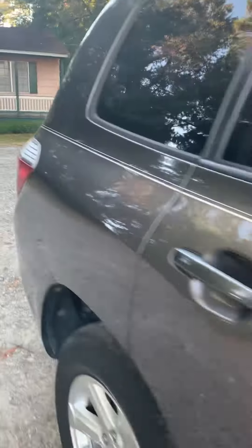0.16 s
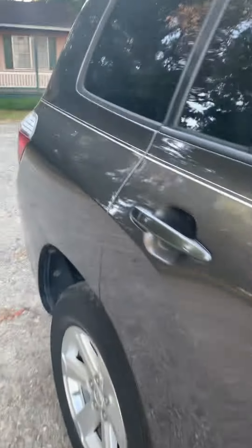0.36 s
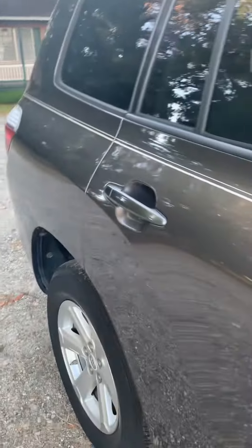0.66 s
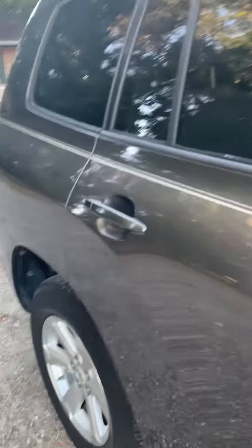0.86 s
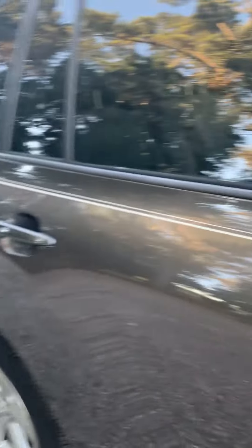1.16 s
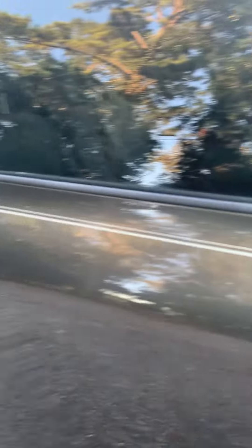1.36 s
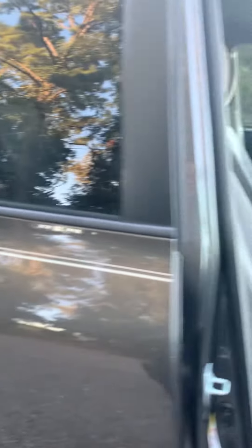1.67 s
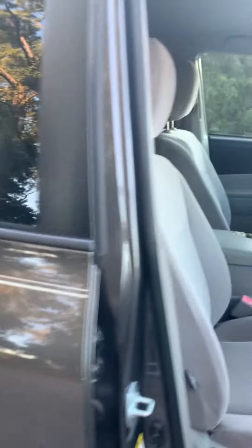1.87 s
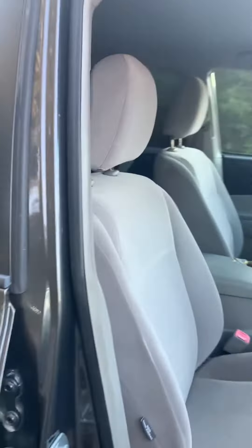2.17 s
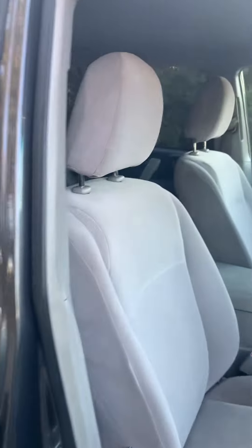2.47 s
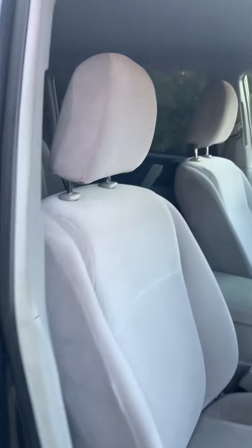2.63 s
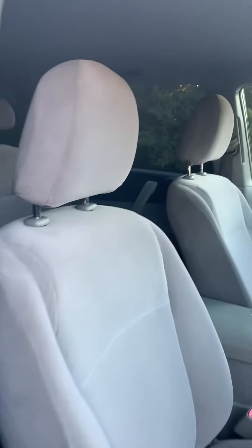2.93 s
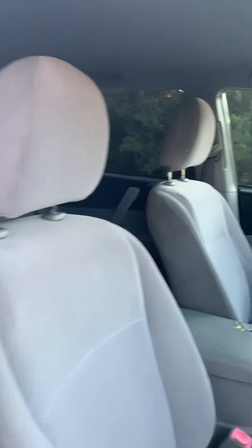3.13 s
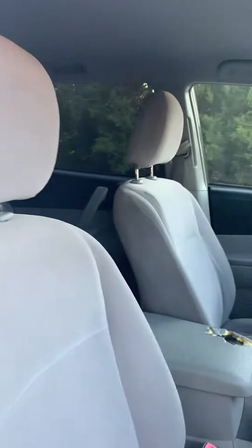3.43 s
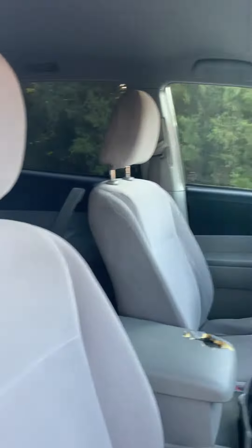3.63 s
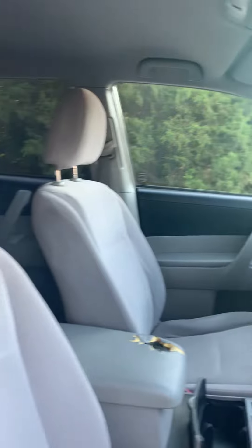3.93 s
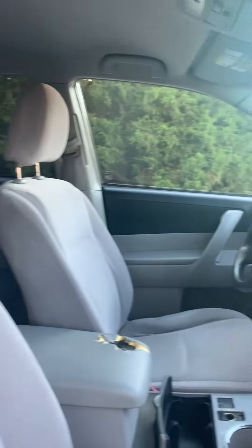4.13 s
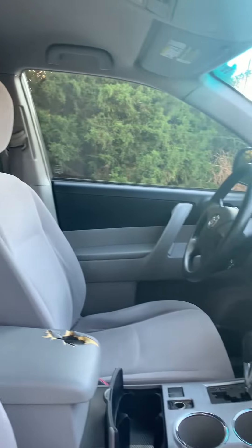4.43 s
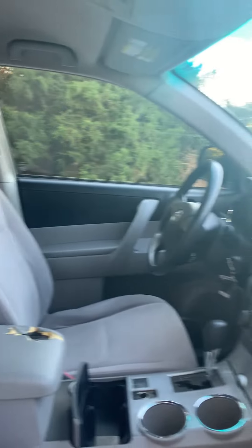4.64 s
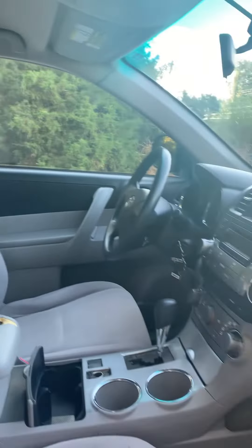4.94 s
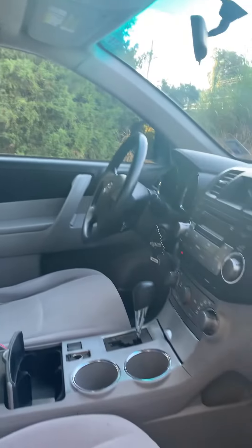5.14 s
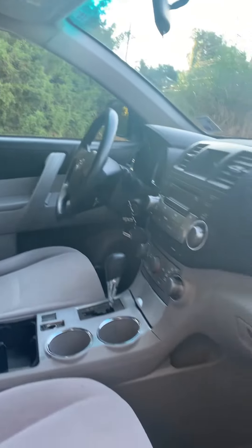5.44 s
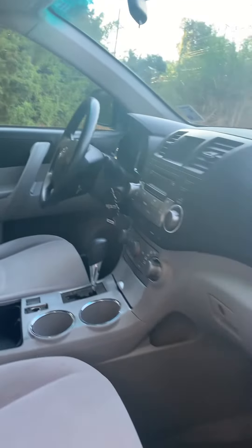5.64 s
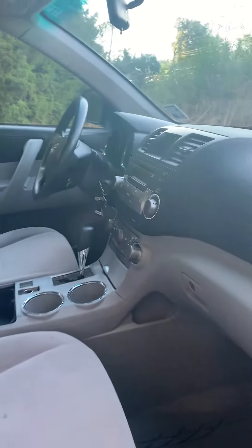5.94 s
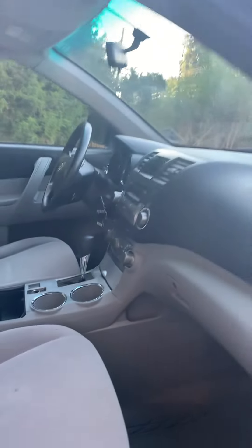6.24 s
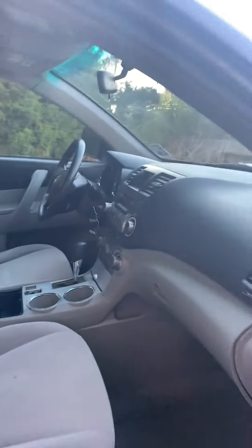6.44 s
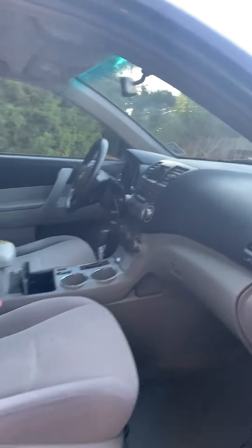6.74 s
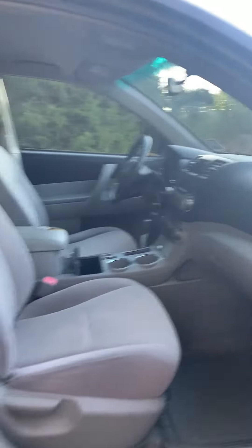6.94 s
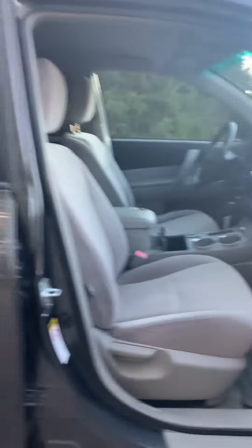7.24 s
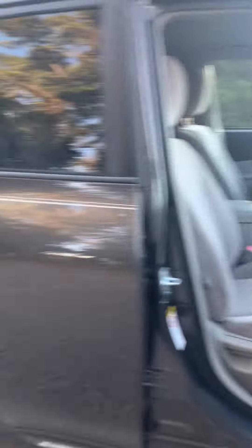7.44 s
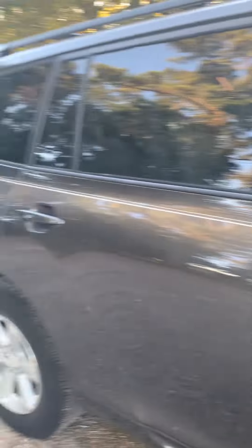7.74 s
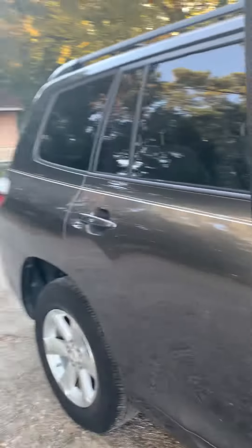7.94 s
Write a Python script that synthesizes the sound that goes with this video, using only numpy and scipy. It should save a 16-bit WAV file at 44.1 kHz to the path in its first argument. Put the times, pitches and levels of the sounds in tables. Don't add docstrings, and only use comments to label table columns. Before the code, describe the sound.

Right at 0 s a car door slams: a deep, short panel thump with small rebounds and rattle, its echo gone by about 0.15 s. Light handle taps and a gravel scuff follow near 0.3 s, then a louder, hollow double clunk at 0.7-0.8 s with sharp stone clicks. Faint shoes crunch on gravel, clearer at 1.8 s, while low wind buffets around 1.4-2.2 s. Beneath it all lies steady distant road rumble and a low engine hum, strongest around 2-3 s, with a vehicle hum swelling near 3.3 s. From 4 to 6.5 s the phone leans into the cabin and the outside grows duller and quieter, with a tiny tick at 4.5 s. A leaf hiss rises near 6.5 s; a rough low lorry drone swells from 6.2 s, dips around 7.45 s and swells again. Gravel steps and stone clicks return at 7-8 s.

```python
import sys
import numpy as np
from scipy import signal
from scipy.fft import rfft, irfft
from scipy.io import wavfile
from scipy.ndimage import uniform_filter1d

SR = 44100
rng = np.random.default_rng(int(sys.argv[2]) if len(sys.argv) > 2 else 0)


def digitize_waveform(pressure):
    field = np.atleast_2d(pressure).T
    bounded = np.clip(field, -1, 1)
    quanta = np.round(bounded * 32767).astype(np.int16)
    wavfile.write(sys.argv[1], SR, quanta)


def level_to_linear(level):
    exponent = np.asarray(level, float) / 20
    return 10 ** exponent


N = 357210

# frequency_hz, level_db (per Hz)
ROAD_SPECTRUM = [(20, -34), (40, -7), (65, 4.5), (110, 0), (230, -8.5), (330, -14.5), (520, -21),
                 (800, -17), (1600, -22), (2400, -34), (4500, -40.5), (7000, -44), (13000, -67.5),
                 (15000, -82)]
# frequency_hz, share (0-1)
COHERENCE = [(30, 0.99), (350, 0.99), (700, 0.43), (1900, 0.18), (2500, 0.4), (3100, 0.13), (3800, 0.3),
             (4300, 0.2), (4650, 0.89), (5500, 1), (6000, 0), (7300, 0.25), (9500, 0.6), (15000, 0.7)]
# frequency_hz, phase_rad
FAR_PHASE = [(0, 0), (700, 1.5), (1100, 4.5), (1700, 5.5), (2200, 9.5), (2800, 10), (3200, 11),
             (3800, 13.5), (4650, 16), (5600, 16.5), (6300, 11.5), (7400, 11), (9000, 9), (10600, 11),
             (11300, 5.5), (13300, 7.5), (14600, 1), (22050, -12)]
# frequency_hz, phase_rad
CLOSE_PHASE = [(0, 0.5), (100, 0.33), (520, 1.5), (1200, 0.5), (4200, 1.5), (4750, -2.5), (5600, -1.5),
               (6200, -6), (7400, -5.5), (9000, -8.5), (10500, -10), (11500, -12), (13600, -11),
               (14600, -17), (22050, -18)]
# time_s, shelter (0-1)
CABIN_SHELTER = [(0, 0.1), (3.4, 0.04), (3.9, 0.43), (4.3, 0.58), (5.0, 0.9), (5.6, 0.9), (6.0, 0.69),
                 (6.5, 0.73), (7.0, 0.21), (8.1, 0)]
# low_hz, high_hz
LAYER_BANDS = [(30, 220), (310, 470), (900, 2000), (2200, 4500), (5800, 8500)]
LAYER_OPEN = [-36, -50.5, -48.5, -55.5, -69.5]
LAYER_CABIN = [-3.5, -3, 0, -7, -11.5]
# centre_s, half_length_s, lift_db
CAR_SWELLS = [(.72, 0.4, 4.5), (1.4, 0.32, 7.5), (2.12, 0.33, 3.5), (3.75, 0.27, 3), (4.6, 0.3, -2),
              (4.95, 0.33, 3.5), (7.35, 0.28, 0)]
CAR_LAYER_SHARES = [0.26, 0.19, 0.65, 0.6, 0]
# centre_s, half_length_s, lift_db
WHEEL_SWELLS = [(.18, 0.038, -9), (2.1, 0.12, 4), (2.9, 0.11, 4.5), (3.4, 0.36, 4.5), (7.08, 0.2, 13.5),
                (7.8, 0.39, 6.5)]
# centre_s, half_length_s, lift_db
LEAF_PUFFS = [(1.8, 0.53, 3.5), (2.87, 0.41, 5.5), (3.5, 0.13, 3), (6.47, 0.35, 13.5), (7.25, 0.035, -3),
              (8.1, 0.093, 8)]
PUFF_LAYER_SHARES = [0.082, 0.086, 0.19, 0.093, 0.94]
# centre_s, half_length_s, lift_db
BOUGH_RUSHES = [(3.05, 0.31, -0.5), (3.65, 0.14, -1), (4.5, 0.23, -0.5), (6.5, .3, -1)]
# centre_s, half_length_s, centre_hz, width_hz, level_db
VEHICLE_SWELLS = [
    (3.29, 0.48, 423, 116, -44),
    (3.21, 0.58, 3600, 1200, -60.5),
    (3.36, 0.13, 425, 70, -43),
    (2.8, 0.14, 370, 55, -48),
    (5.52, 0.44, 525, 80, -53),
    (4.64, 0.34, 170, 60, -49),
    (5.8, 0.23, 190, 55, -47.5),
]
# time_s, firing_hz, level_db
ENGINE_FIRING = [(0, 131.6, -63.5), (.4, 130.6, -38), (1, 131.1, -37), (1.5, 131.9, -41), (2, 132.3, -34),
                 (2.6, 132.1, -33), (3.2, 131.1, -36.5), (3.8, 131.3, -41.5), (4.2, 130.8, -43.5),
                 (4.5, 129.9, -50), (6.9, 132.2, -54), (7.1, 128.9, -36), (7.4, 131.4, -62.5),
                 (7.8, 132.2, -33), (8.1, 131.1, -37.5)]
# time_s, level_db
LORRY_LEVEL = [
    (5.7, -50.5),
    (6.2, -37.5),
    (6.6, -38.5),
    (6.75, -32.5),
    (7.05, -31.5),
    (7.45, -37),
    (7.62, -31),
    (7.95, -31.5),
    (8.1, -45.5),
]
# start_s, length_s, level_db
WIND_GUSTS = [(0.028, 0.24, -40), (1.397, .14, -33.5), (1.614, 0.28, -35.5), (1.887, 0.34, -37),
              (6.953, 0.52, -54), (7.65, 0.4, -45.5)]
# start_s, length_s, crunch_db, low_weight_db
FOOTSTEPS = [(0, .08, -69, 2.5), (0.212, 0.081, -66.5, -4), (0.293, 0.034, -70.5, 6),
             (0.679, 0.034, -64, 4), (0.715, 0.069, -67.5, 5.5), (1.134, .071, -77.5, -5),
             (1.319, 0.13, -73.5, 13), (1.755, 0.024, -70, 7.5), (1.79, 0.02, -60.5, -5),
             (1.799, 0.084, -67, 2), (2.097, .063, -73, -7), (2.476, 0.086, -73, 9), (2.647, .25, -82, 18),
             (2.987, .06, -80.5, 15), (3.25, .197, -81.5, 9), (5.95, .09, -85, -11),
             (6.333, .271, -71.5, -27), (6.924, 0.14, -75.5, 6.5), (7.103, 0.091, -73, -6),
             (7.334, .06, -79, -2), (7.167, 0.085, -61, 5), (7.256, 0.071, -61.5, -1),
             (7.323, 0.028, -73, 5), (7.395, .051, -69.5, -22), (7.637, 0.14, -64, -24),
             (7.787, 0.2, -73, -1.5), (7.99, 0.082, -66, 5.5)]
# frequency_hz, level_db (per Hz)
GRAVEL_SPECTRUM = [(500, 12), (1500, 22), (2500, 9.5), (3800, 10), (6000, 6), (9000, 3.5), (13000, 4.5),
                   (14500, -13), (16000, -30)]
# start_s, length_s,
# centre_hz, width_hz, level_db
DRAGS = [(.22, .07, 1104, 300, -50), (0.268, 0.02, 499, 158, -37), (0.333, 0.031, 803, 200, -50),
         (0.726, 0.027, 1915, 1200, -51), (1.762, .11, 3985, 1600, -55), (1.783, .085, 6500, 2500, -61),
         (4.476, .03, 5780, 1500, -69), (4.5, 0.095, 4940, 2500, -69), (6.728, 0.017, 798, 400, -50),
         (6.813, 0.016, 801, 403, -46), (7.172, .03, 3200, 2500, -55), (7.194, 0.12, 1500, 1081, -45.5),
         (7.196, 0.1, 3770, 1800, -57.5), (7.168, 0.067, 6930, 2500, -63)]
# start_s, crack_db, ring_hz, ring_db
BURIED_STONES = [(.264, -43.5, 12500, -57), (.31, -45, 8030, -56), (.7228, -25.5, 11000, -39),
                 (.7241, -24, 13000, -44), (1.3069, -46.5, 7700, -57), (1.3339, -42, 12600, -58),
                 (1.4406, -32, 12500, -37), (1.918, -53.5, 6000, -62), (2.1001, -51.5, 6300, -46),
                 (2.4962, -48, 11400, -70), (5.9973, -63, 8100, -58), (6.2382, -47, 6700, -55),
                 (6.9461, -46.5, 3280, -39), (7.0204, -58, 8300, -49), (7.0643, -34, 3050, -41),
                 (7.1746, -36, 3460, -45), (7.2818, -41, 11400, -42.5), (7.293, -42, 12000, -45),
                 (7.285, -57.5, 1900, -29.5), (7.313, -47.5, 7480, -40.5), (7.3412, -39.5, 4070, -38),
                 (7.3644, -49.5, 12400, -51.5), (7.417, -51, 12460, -55), (7.3935, -41.5, 12300, -43),
                 (7.3968, -37, 11900, -42), (7.498, -61, 11540, -61), (7.6326, -53, 6470, -47),
                 (7.8785, -59, 3030, -34.5), (7.9488, -44.5, 12900, -64), (7.9798, -50, 7040, -48),
                 (7.9987, -28.5, 6230, -37.5), (7.9995, -55, 2200, -48)]
# start_s, crack_db, ring_hz, ring_db
LOOSE_STONES = [(1.7659, -53, 3770, -44), (1.7883, -40.5, 4290, -38), (1.789, -48, 3400, -36.5),
                (1.809, -39, 4070, -38), (1.827, -44.5, 4530, -43.5), (1.852, -52, 4180, -49.5),
                (1.87, -54, 4350, -53), (6.735, -63, 785, -40), (6.8, -58.5, 2650, -39),
                (6.822, -65, 806, -37)]
# start_s, crack_db, ring_hz, ring_db
CLEAR_STONES = [(.684, -50, 7670, -43), (4.484, -82, 5886, -60), (4.487, -84, 4370, -42.5),
                (4.497, -84, 3950, -46), (4.556, -82, 5300, -65)]
# frequency_hz, level_db, t60_s
SLAM_RESONANCES = [(52.8, -9, 0.33), (67.6, -6.5, 0.096), (81.5, 1.5, 0.21), (108.4, -3, 0.16),
                   (138, -7.5, 0.18), (169.8, -8, 0.35), (217.4, -24, 0.11), (296, -3.5, 0.25),
                   (356, -18.5, 0.44), (436, -26, 0.092), (1034, -38, .1), (1320, -25, .08)]
# frequency_hz, level_db, t60_s
KNOCK_RESONANCES = [(66.6, -12, 0.12), (104.5, -8.5, .12), (133, -23, 0.089), (184, -10, 0.4),
                    (239.6, -1, 0.1), (290.7, -15.5, 0.79), (347.3, 2, 0.085), (390, -2, 0.1),
                    (479, -4.5, 0.14), (730, -7, 0.018), (810, -18, 0.054), (928, -5.5, 0.022),
                    (1160, -10, 0.031), (1410, -5, 0.031), (1624, -2.5, 0.049), (1810, -17, 0.02),
                    (2200, -17, 0.035), (2820, -12, 0.021)]
# start_s, level_db, contact_ms, direction (+1 push, -1 pull)
SLAM_BLOWS = [
    (.0005, -27.5, 0.88, 1),
    (.0072, -9, 3.57, 1),
    (.02, -24, 1.7, 1),
    (.033, -22.5, 1.3, -1),
    (.045, -23.5, 3.5, 1),
    (.05, -19, 0.96, 1),
    (.065, -35, 3.8, 1),
    (.078, -21, 2.1, 1),
    (.107, -31.5, 1.1, 1),
    (.12, -36, 3.1, 1),
]
# start_s, level_db, contact_ms, direction (+1 push, -1 pull)
KNOCK_BLOWS = [(.268, -40, 0.55, 1), (.279, -43.5, 0.63, -1), (.2985, -33, 1.5, 1), (.307, -31.5, 2, 1),
               (.321, -33, 2.9, 1), (.684, -29.5, 2.4, 1), (.72, -17.5, 1.9, -1), (.7235, -22.5, 0.26, 1),
               (.733, -23.5, 0.34, 1), (.745, -16.5, 6.2, 1), (.748, -37.5, 0.28, -1),
               (.758, -12.5, 3.5, 1), (.764, -22, 2.5, -1), (.78, -19.5, 2.3, -1)]


def on_time(table):
    s, *columns = np.transpose(table)
    return [np.interp(np.arange(N) / SR, s, c) for c in columns]


def on_hz(table):
    hz, value = np.transpose(table)
    return np.interp(np.log(np.fft.rfftfreq(N, 1 / SR) + 1), np.log(hz), value)


def within(start, length, fade_s):
    t = np.arange(N) / SR - start
    return np.clip(np.minimum(t, length - t) / fade_s + .5, 0, 1)


def bumps(rows):
    t = np.arange(N) / SR
    return sum(h * np.exp(-((t - s) / half) ** 2) for s, half, h in rows)


def unit(x):
    return x / np.sqrt(np.mean(x ** 2))


def walk(rate):
    k = int(SR / rate)
    held = np.repeat(rng.standard_normal(N // k + 1), k)
    return 1.123 * uniform_filter1d(uniform_filter1d(held, k), k)[:N]


def narrow(hz, width_hz):
    lowpass = signal.butter(3, width_hz / 2, fs=SR, output="sos")
    wander = signal.sosfilt(lowpass, rng.standard_normal((2, N)))
    carrier = np.exp(2j * np.pi * np.cumsum(hz) / SR)
    return unit(np.real((wander[0] + 1j * wander[1]) * carrier))


def steady_band(hz, width_hz):
    return narrow(np.full(N, float(hz)), width_hz)


def ports(x, phase_table=FAR_PHASE):
    turn = np.interp(np.fft.rfftfreq(N, 1 / SR), *np.transpose(phase_table))
    return np.array([x, irfft(rfft(x) * np.exp(1j * turn), N)])


def layers_db():
    col = lambda v: np.array(v)[:, None]
    t = np.arange(N) / SR
    echo_s, echo_rise_s, echo_db = 0.07, 0.012, [6.6, 22.3, 1, 8.6, 4.3]
    echo = np.exp(-(t / echo_s) ** 2) * np.clip(t / echo_rise_s, 0, 1)
    out = col(LAYER_OPEN) + col(LAYER_CABIN) * on_time(CABIN_SHELTER)[0] + col(echo_db) * echo
    out = out + col(CAR_LAYER_SHARES) * bumps(CAR_SWELLS) + col(PUFF_LAYER_SHARES) * bumps(LEAF_PUFFS)
    out[1] += bumps(WHEEL_SWELLS)
    out[3] += bumps(BOUGH_RUSHES)
    return out


def road():
    f, share = np.fft.rfftfreq(N, 1 / SR), np.clip(on_hz(COHERENCE), 0, 1)
    common, own = ports(rng.standard_normal(N)), rng.standard_normal((2, N))
    mixed = np.sqrt(share) * rfft(common) + np.sqrt(1 - share) * rfft(own)
    spectrum = level_to_linear(on_hz(ROAD_SPECTRUM)) * mixed
    power = np.mean(abs(spectrum) ** 2, axis=0) * 2 / N ** 2
    lift_db = []
    for db, (low, high) in zip(layers_db(), LAYER_BANDS):
        lift_db.append(db - 10 * np.log10(power[(f > low) & (f < high)].sum()))
    octave, out, swell = np.log2(f + 1), 0, .6 * walk(3)
    shelter = on_time(CABIN_SHELTER)[0]
    for centre in np.arange(4.25, 14.5, .5):
        place = np.interp(centre, [7.75, 8.75, 9.75, 11.25, 12.75], range(5))
        k = min(int(place), 3)
        db = lift_db[k] + (place - k) * (lift_db[k + 1] - lift_db[k]) + swell + 1.6 * walk(9)
        db = db - 9.5 * max(centre - np.log2(7000), 0) * shelter
        window = np.clip(1 - 2 * abs(octave - centre), 0, 1)
        out = out + level_to_linear(db - 0.5) * irfft(spectrum * window, N)
    return out


def flank(x, paths):
    out = x
    for ms, sway_ms, share in paths:
        place = np.arange(N) - (ms + sway_ms * walk(4)) * SR / 1000
        out = out + share * np.array([np.interp(place, np.arange(N), c) for c in x])
    return out


def far_swell():
    swells = 0
    for s, half, hz, width, db in VEHICLE_SWELLS:
        swells = swells + bumps([(s, half, level_to_linear(db))]) * steady_band(hz, width)
    return ports(swells)


def engine():
    hz, db = on_time(ENGINE_FIRING)
    low_db = -42.5 - 15.5 * on_time(CABIN_SHELTER)[0] + 0.34 * (db - db.mean())
    high_db = -64.5 + bumps([(3.57, 0.14, 27.6), (3.83, 0.11, 23)])
    firing = np.sqrt(2) * np.sin(2 * np.pi * np.cumsum(hz + 0.66 * walk(5.76)) / SR) * level_to_linear(2.13 * walk(8))
    fifth = level_to_linear(-12.0) * narrow(3 * hz / 2, width_hz=11.4)
    below = level_to_linear(low_db) * narrow(hz / 2, width_hz=15.3)
    above = level_to_linear(high_db + 2.2 * walk(14)) * np.sin(4 * np.pi * np.cumsum(hz) / SR)
    return level_to_linear(db) * (firing + fifth) + below + above


def lorry():
    def both(hz, width_hz):
        return np.array([narrow(hz, width_hz) for _ in "LR"])

    t, db = np.arange(N) / SR, on_time(LORRY_LEVEL)[0]
    pass_s = 7.2
    abreast = bumps([(pass_s, .25, 1)])
    hz = 260 - 22 * (t - pass_s)
    heard = t > LORRY_LEVEL[0][0]
    line = 0.68 * level_to_linear(1.3 * walk(11)) * np.sin(2 * np.pi * np.cumsum(hz + 1.34 * walk(8)) / SR)
    rough = 1.04 * np.clip((t - 6.5) / 0.22, .2, 1) * narrow(hz, width_hz=43.2)
    drone = ports(line + rough) + 0.12 * both(hz, width_hz=7.7)
    second = ports(narrow(2 * hz, width_hz=30.0)) + 0.95 * both(2 * hz, width_hz=163.0)
    whine = both(755.4 - 118.2 * abreast, width_hz=180.0) * np.clip(t - 4.45, 0, 1)
    upper = level_to_linear(db - 13 + 10.5 * abreast) * second * heard + level_to_linear(-48 + 11 * abreast) * whine
    van = bumps([(5.075, 0.67, level_to_linear(-43.5))]) * steady_band(225.9, width_hz=42.0)
    return level_to_linear(db) * drone * heard + level_to_linear([[-2.5], [2.5]]) * upper + ports(van)


def gusts():
    sos = signal.butter(2, [35, 170], "band", fs=SR, output="sos")
    a, b = [unit(signal.sosfilt(sos, rng.standard_normal(N)) * level_to_linear(5.5 * walk(30))) for _ in "LR"]
    envelope = sum(level_to_linear(db) * within(s, length, fade_s=0.06) ** 2 for s, length, db in WIND_GUSTS)
    return envelope * np.array([a + 0.27 * b, 0.33 * b - a])


def gravel():
    f, colour = np.fft.rfftfreq(N, 1 / SR), level_to_linear(on_hz(GRAVEL_SPECTRUM))
    grains = (rng.random(N) < 1200 / SR) * level_to_linear(3 * np.minimum(rng.exponential(size=N), 3))
    grains = signal.lfilter([1], [1, -.97], grains) * rng.standard_normal(N)
    spectrum = colour * rfft(unit(grains) + 1.26 * rng.standard_normal(N))
    low = 1 / (1 + (f / 6000) ** 4)
    scale = np.std(irfft(spectrum * (f > 10800) * (f < 13500), N))
    bright, dull = irfft(spectrum * (1 - low), N) / scale, irfft(spectrum * low, N) / scale
    out = 0
    for start, length, db, weight_db in FOOTSTEPS:
        gate = within(start, length, 0.3 * length) ** 2
        out = out + gate * level_to_linear(db) * (bright + level_to_linear(weight_db) * dull)
    return out * level_to_linear(3.6 * walk(60))


def scuffs():
    out = 0
    for s, length, hz, width, db in DRAGS:
        out = out + level_to_linear(db) * within(s, length, 0.17 * length) * steady_band(hz, width)
    return out * level_to_linear(4 * walk(150))


def stones():
    out, t = np.zeros(N + 2000), np.arange(2000) / SR
    rows = [(*row, 18, .69) for row in BURIED_STONES]
    rows += [(*row, 25, .69) for row in LOOSE_STONES]
    rows += [(*row, 36, .3) for row in CLEAR_STONES]
    for s, db, hz, ring_db, t60_ms, rough in rows:
        noise = rng.standard_normal(2000)
        crack = level_to_linear(db - 4.5) * signal.lfilter([1], [1, -0.27], noise) * np.exp(-t / .0014)
        scrape = .5 + rough * unit(uniform_filter1d(noise[::-1], size=40))
        decay = 1000. ** (-t / (t60_ms / 1000)) * (1 - np.exp(-t / 0.00023))
        ring = level_to_linear(ring_db) * scrape * np.sin(2 * np.pi * hz * t) * decay
        out[int(s * SR):int(s * SR) + 2000] += crack + ring
    return signal.sosfilt(signal.butter(2, [700, 15500], "band", fs=SR, output="sos"), out[:N])


def panel(blows, modes):
    t, force = np.arange(SR) / SR, np.zeros(N)
    for s, db, ms, sign in blows:
        push = np.sin(np.pi * np.clip((t[:2000] - s % (1 / SR)) / (ms / 1000), 0, 1))
        force[int(s * SR):int(s * SR) + 2000] += sign * level_to_linear(db) * push / push.sum()
    ring = sum(level_to_linear(db) * np.sin(2 * np.pi * hz * t) * 1000. ** (-t / t60) for hz, db, t60 in modes)
    radiation = signal.butter(2, 45, "high", fs=SR, output="sos")
    return signal.sosfilt(radiation, signal.fftconvolve(force, ring)[:N])


def nearby(x, t60_ms, db):
    t, share = np.arange(4000) / SR, np.clip(on_hz(COHERENCE), 0, 1)
    tails = rng.standard_normal((3, 4000)) * 1000. ** (-t * 1000 / t60_ms)
    tails = level_to_linear(db) * tails / np.linalg.norm(tails, axis=1, keepdims=True)
    scattered = rfft(tails, N) * rfft(x) * on_hz([(225, 0), (450, 1)])
    common = irfft(np.sqrt(share) * scattered[2], N)
    own = irfft(np.sqrt(1 - share) * scattered[:2], N)
    return ports(x + common, CLOSE_PHASE) + own


def scene():
    far = flank(road(), [(3.1, 0.755, 0.32), (7.3, 1.307, 0.42)]) + far_swell()
    far = far + ports(engine()) + lorry()
    shoes = nearby(gravel() + scuffs(), t60_ms=25., db=-6) + nearby(stones(), t60_ms=6., db=-5)
    blows = panel(SLAM_BLOWS, SLAM_RESONANCES) + panel(KNOCK_BLOWS, KNOCK_RESONANCES)
    return far + gusts() + shoes + nearby(blows, t60_ms=39.0, db=-3.5)


def roll_off(x):
    return signal.sosfilt(signal.butter(12, 14460, fs=SR, output="sos"), x)


def record(dry):
    hiss = level_to_linear(-90.0) * ports(np.diff(rng.standard_normal(N + 2), n=2))
    bass_cut = signal.butter(2, 28, "high", fs=SR, output="sos")
    return roll_off(signal.sosfilt(bass_cut, dry + hiss))


dry = scene()
out = record(dry)
digitize_waveform(out)
```